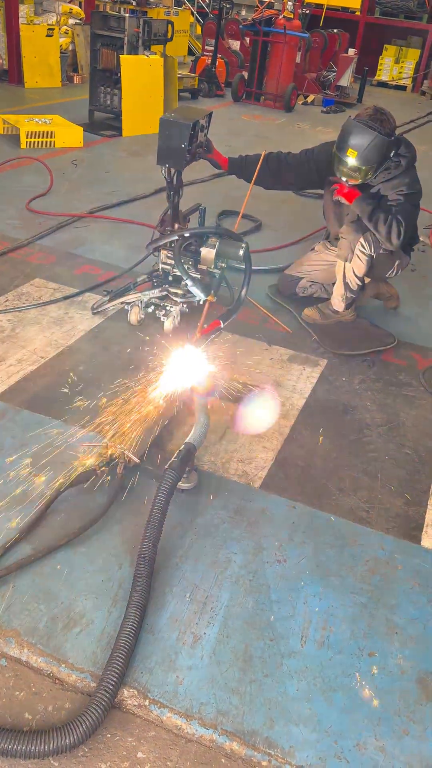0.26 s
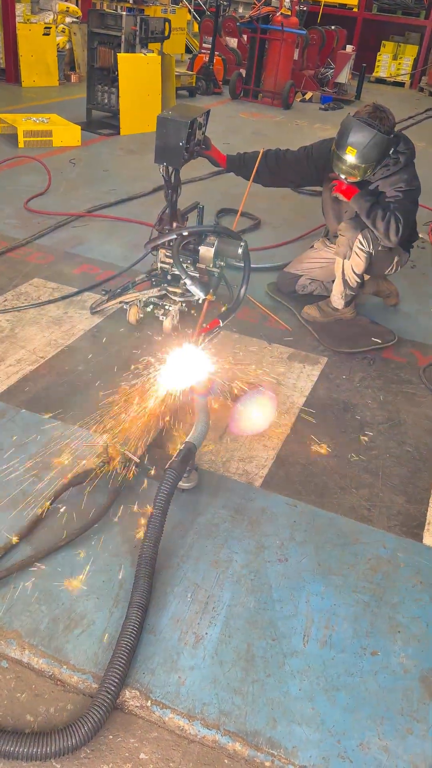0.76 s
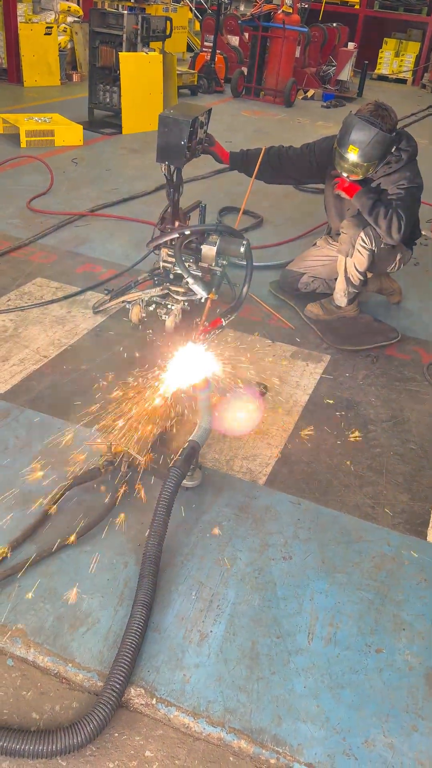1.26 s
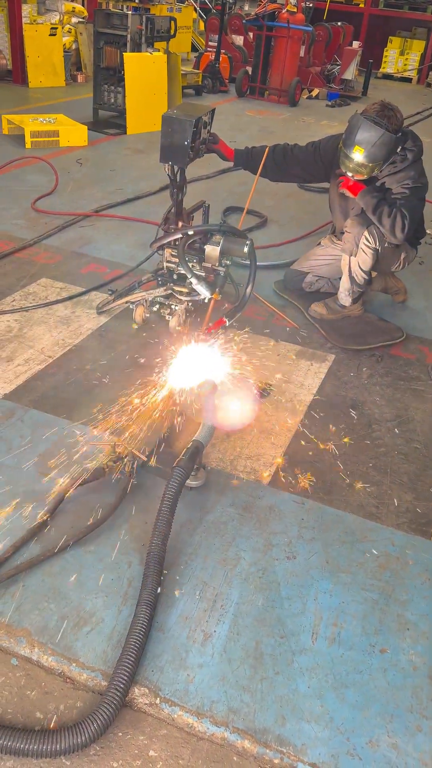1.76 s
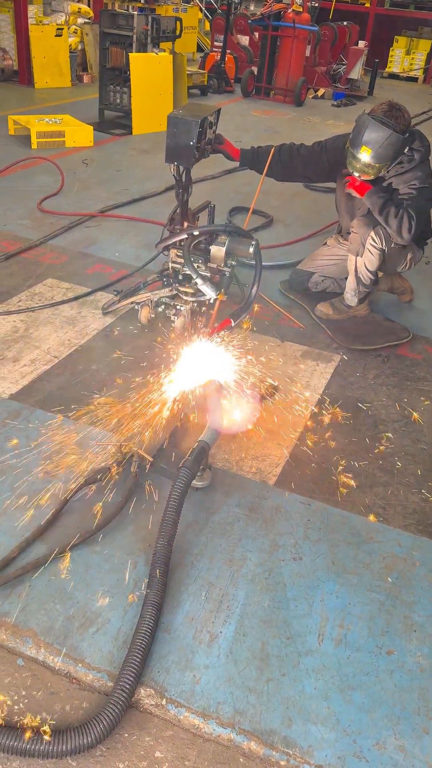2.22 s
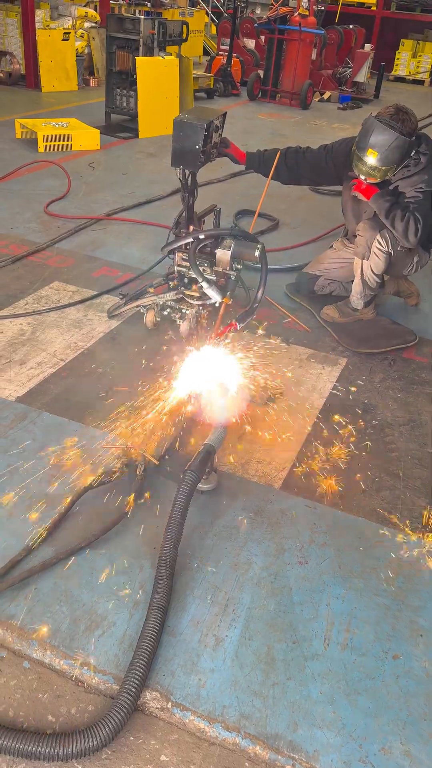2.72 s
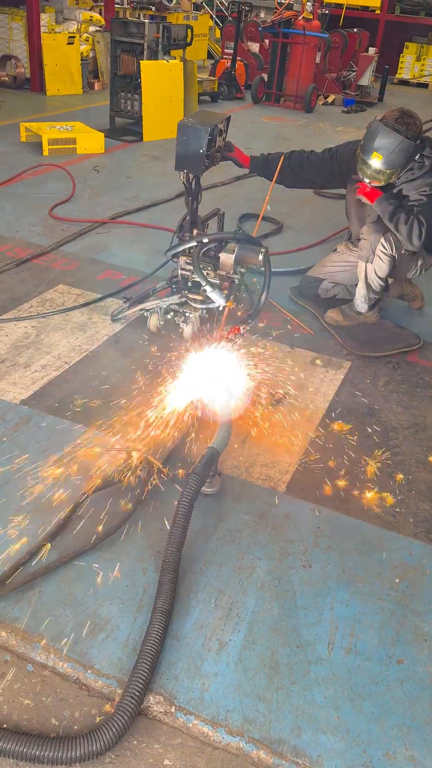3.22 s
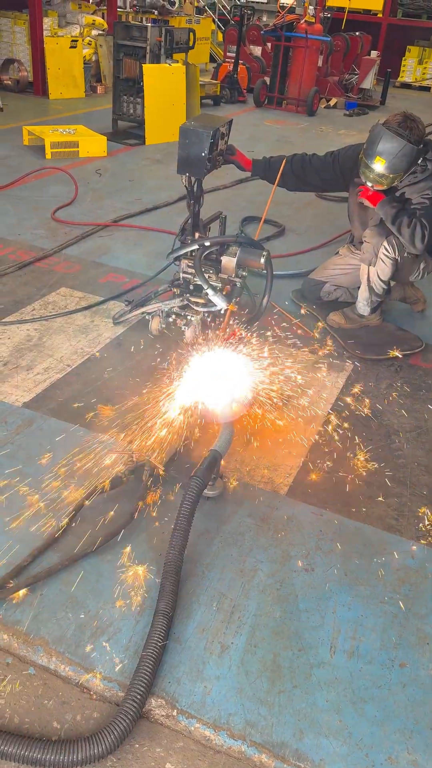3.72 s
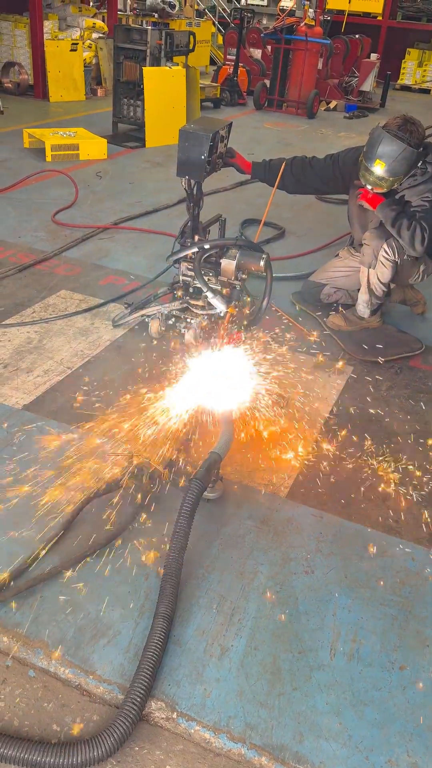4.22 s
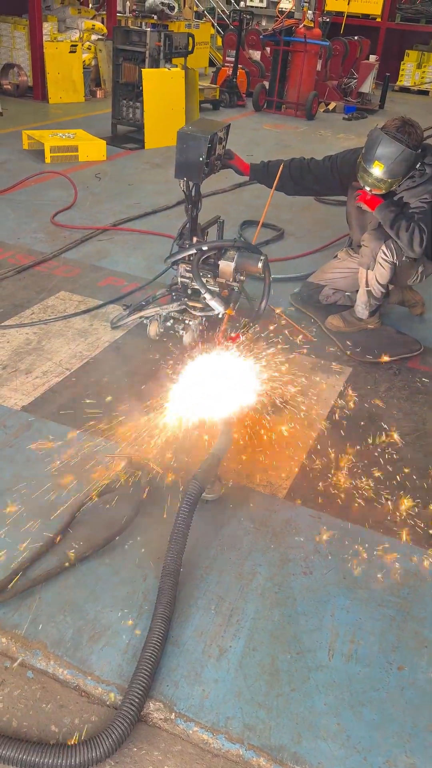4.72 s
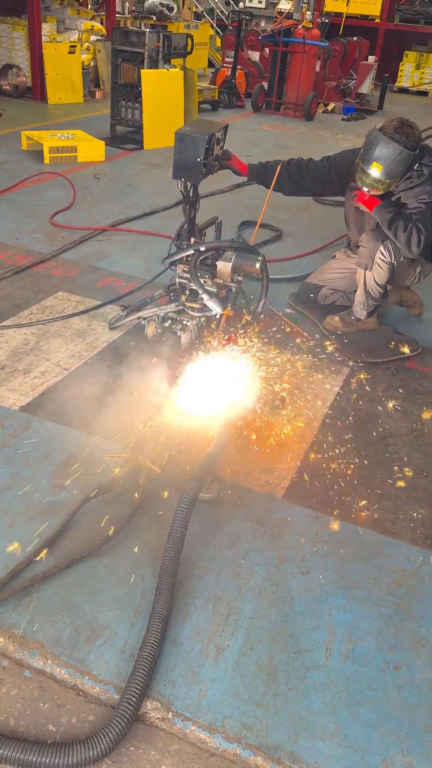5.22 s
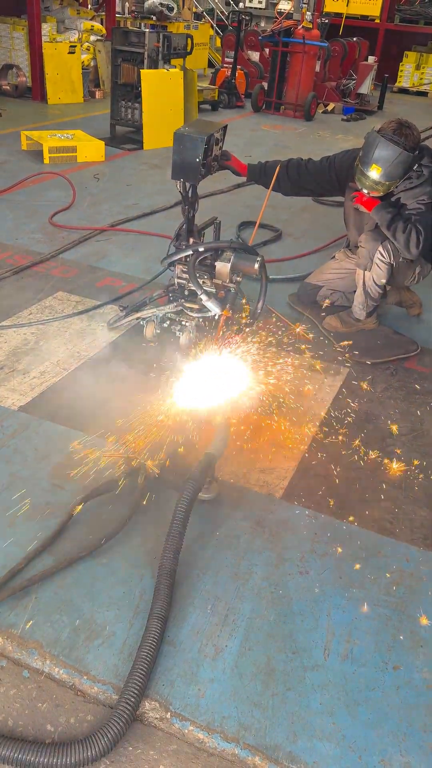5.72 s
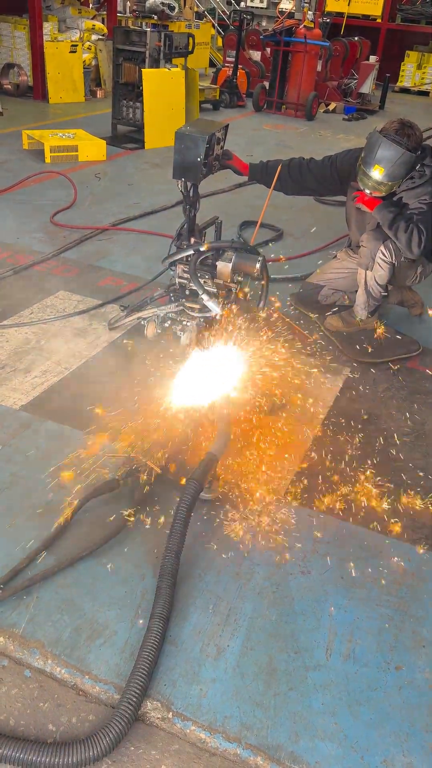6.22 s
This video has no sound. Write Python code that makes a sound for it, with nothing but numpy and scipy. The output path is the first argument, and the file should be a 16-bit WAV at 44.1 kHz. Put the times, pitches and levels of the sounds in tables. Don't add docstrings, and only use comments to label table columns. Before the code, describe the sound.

Close, harsh arc gouging on steel: bright tearing hiss and rapid crackle, sharp irregular snaps through the middle, then a slacker, duller roar.

```python
import sys
import numpy as np
from scipy import signal
from scipy.fft import rfft, irfft, next_fast_len
from scipy.io import wavfile

SR = 44100
rng = np.random.default_rng(int(sys.argv[2]) if len(sys.argv) > 2 else 0)


def invert_db(x):
    u = np.asarray(x, float) / 20
    return 10 ** u


def transcribe(signal):
    frames = np.atleast_2d(signal).T
    limited = np.clip(frames, -1, 1)
    pcm = np.round(limited * 32767).astype(np.int16)
    wavfile.write(sys.argv[1], SR, pcm)


N = 285327

# [t/s, blast level/dB, crackle level/dB]
CUT_COURSE = [(0, -18, -10.5), (.6, -19, -7.5), (1.2, -18.5, -5.5), (1.4, -19.5, -5.5), (1.95, -19.5, -5.5),
              (2.25, -21.5, -6.5), (2.8, -21, -6.5), (3.3, -21, -5.5), (3.8, -21, -4), (4.3, -22, -11.5),
              (4.65, -23, -10.5), (5.05, -22.5, -14.5), (5.2, -24, -4.5), (5.55, -25.8, -11),
              (5.8, -24, -9), (6, -26, -6), (6.47, -26, -13)]
# [t/s, level at the turning point/dB]
ROD_STUTTERS = [(.28, -1.5), (.75, 1.3), (1.1, -1), (1.28, -2), (1.52, 1), (1.64, 0.5), (2.04, -2.5),
                (2.13, 1), (2.17, -2), (2.36, -1.5), (2.47, 2), (2.54, -1.5), (2.84, -2), (3.15, -2),
                (3.41, 0.5), (3.46, -2), (3.51, 1.5), (3.92, -1.5), (4.19, -2.5), (4.41, -2.3),
                (4.73, -1.8), (5.14, -0.5), (5.24, -0.5), (5.45, -2), (5.5, 2), (5.55, -3), (5.76, -1.6),
                (6.33, 1.5)]
# [t/s, peak level/dB]
RESTRIKES = [(0.7778, 0), (0.9032, -3.8), (1.2139, -4.3), (1.5214, 0), (1.5371, 2), (1.5575, -1),
             (1.7405, -4.0), (1.7938, -3.9), (1.9008, -3.0), (2.1245, 1), (2.2245, -1), (2.4748, -3),
             (2.6335, -2), (2.7085, -2), (2.7868, -2), (2.7922, -1), (3.0156, -1), (3.3555, -4.3),
             (3.3866, -3), (3.4127, -4.0), (3.4674, -1), (3.5064, -4.2), (3.5201, 2), (3.555, 2),
             (3.6592, -2), (3.7136, -3), (3.829, -4), (3.8967, -3), (4.0599, -5), (5.085, -4)]
# [f/Hz, depth/0-1]
CURRENT_RIPPLE = [(99.88, 0.01), (199.8, 0.01), (299.66, .07)]
# [f/Hz, level per Hz/dB]
JET_ROAR = [(25, -52), (60, -39), (270, -25), (330, -19), (850, -12.5), (1020, -16), (1250, -10),
            (1750, -5.5), (2050, -1), (2850, -0.5), (3900, -2.5), (4850, -3), (5850, -0.5), (6500, -2.5),
            (7400, -5.5)]
# [f/Hz, added level/dB]
JET_HISS = [(7400, 0), (8900, 3), (9600, 1.5), (10400, 2), (12000, 0), (13400, -4), (14800, 0.5),
            (16000, -1)]
# [f/Hz, width/Hz, level/dB]
GROOVE_MODES = [(429, 38, 4), (590, 47, 4.5), (920, 170, 2.5), (1204, 89, 3.5), (1530, 55, 3.5),
                (1720, 74, -2), (2127, 86, -2.5), (2850, 150, 1.5), (3126, 140, -3), (3310, 150, 2.5),
                (4940, 120, -4), (5700, 160, 1)]
# [f/Hz, left minus right level/dB, right lead/rad,
# likeness/0-1]
PORT_PAIR = [(330, 0, -0.019, 0.99), (690, -2.6, 0.037, .97), (1030, -4, -0.2, 0.87),
             (1600, -1.5, 0.22, .988), (2020, -4.5, 0, 1), (2450, -1, -1.04, 0.9), (3050, 4, 0.55, .76),
             (4040, 2, 0.63, 1), (5100, 1, 1.92, 0.94), (5200, 7, 0.31, 0.74), (5450, 0, 0.22, 0.83),
             (5750, 0, 0, 0.94), (6600, 0, 0.35, 0.98), (7320, -0.5, 0.65, 0.88),
             (11220, 0, 2.47, 0.94), (11500, 0, 2.93, 0.98), (13900, 0, 3.5, 1),
                    (14500, 0, 3.9, .88), (16000, 0, 4.7, .88)]
CROSSOVERS = (1300, 1950, 4900, 7000, 12000)
# [f/Hz, rms level/dB]
HUM_LINES = [(97.18, -62), (99.88, -64.5), (199.81, -73), (299.69, -58), (334.4, -66)]
# [f/Hz, level per Hz/dB]
SHOP_RUMBLE = [(25, -44), (50, -9), (90, -4.5), (160, 1), (260, -3.5), (400, -6), (1200, -26)]

TREBLE_END_HZ = 15760
MEAN_BLAST_DB, MEAN_BITE_DB = -21, -7.5


def rms_one(x):
    return x / np.sqrt(np.mean(x ** 2) + 1e-20)


def in_time(rows):
    s, *columns = np.transpose(rows)
    return [np.interp(np.arange(N) / SR, s, c) for c in columns]


def at_hz(rows, hz):
    f, *columns = np.transpose(rows)
    return [np.interp(np.log(hz + 1), np.log(f), c) for c in columns]


def smooth(x, seconds):
    r = np.exp(-1 / (seconds * SR))
    return signal.lfilter([1 - r], [1, -r], x, zi=[r * x[0]])[0]


def drift(rate_hz):
    lag = 1 / (2 * np.pi * rate_hz)
    wander = smooth(smooth(rng.standard_normal(N + SR), lag), lag)
    slower = smooth(wander, 3 * lag)
    return rms_one((wander - slower)[SR:])


def rod_stutters():
    t = np.arange(N) / SR
    set_in_s, ease_off_s = 0.049, 0.061
    return sum(db * np.interp(t, [s - set_in_s, s, s + ease_off_s], [0, 1, 0]) for s, db in ROD_STUTTERS)


def arc(crackle_db, per_s, spread_db):
    t = np.arange(N) / SR
    current = 1
    for k, (hz, depth) in enumerate(CURRENT_RIPPLE):
        current = current + depth * np.cos(2 * np.pi * hz * t + k)
    sizes = invert_db(spread_db * np.minimum(rng.exponential(1, N), 3.5))
    chance = per_s * invert_db(3.0 * drift(25)) * current ** 3 / SR
    jumps = rng.random(N) < chance
    return current, -invert_db(crackle_db) * rms_one(sizes * jumps)


def jet(current, gust_db):
    flicker_db = gust_db * drift(11) + 1.2 * drift(70)
    return current * invert_db(flicker_db) * rng.standard_normal(N)


def restrikes(source):
    s, peak_db = np.transpose(RESTRIKES)
    source[np.round(s * SR).astype(int)] -= invert_db(peak_db - 2.2)
    return source


def floor_echo(source):
    delay_s, cut_hz, start, fade_s = .00238, 7000, 0.26, 2.9
    bounce = smooth(np.roll(source, round(delay_s * SR)), 1 / (2 * np.pi * cut_hz))
    return start * np.exp(-np.arange(N) / SR / fade_s) * bounce


def reflections(t60_s, size, channels):
    t = np.arange(SR) / SR
    tail = rng.standard_normal((channels, SR)) * invert_db(-60 * t / t60_s) * (t > .003)
    energy = np.sum(tail ** 2, axis=1, keepdims=True)
    return rfft(tail / np.sqrt(energy), size)


def along_the_cut(source, size):
    stops, clutter_db, clutter_t60_s, hall_t60_s = 9, -11.5, .12, .6
    near, hall = 0, 0
    for k in range(stops):
        share = np.clip(1 - abs(np.arange(N) * (stops - 1) / N - k), 0, 1)
        stretch = rfft(source * np.sqrt(share), size)
        near = near + stretch * reflections(clutter_t60_s, size, channels=1)
        hall = hall + stretch * reflections(hall_t60_s, size, channels=2)
    return rfft(source, size) + invert_db(clutter_db) * near, hall


def ports(source):
    size = next_fast_len(N + SR)
    hz = np.arange(size // 2 + 1) * SR / size
    groove_db = sum(db / (1 + (2 * (hz - centre) / width) ** 2) for centre, width, db in GROOVE_MODES)
    colour_db = at_hz(JET_ROAR, hz)[0] + at_hz(JET_HISS, hz)[0] + groove_db
    colour = invert_db(colour_db) * (hz < TREBLE_END_HZ)
    main_band = (hz > 1500) * (hz < 11000)
    colour = colour / np.sqrt(np.mean(colour ** 2 * main_band))
    tilt_db, lead, alike = at_hz(PORT_PAIR, hz)
    alike = np.clip(alike, 0, 1)
    shock_rad = -.4
    turn = np.exp(1j * (shock_rad + np.outer([0, 1], lead)))
    direct, hall = along_the_cut(source, size)
    heard = np.sqrt(alike) * turn * direct + np.sqrt(1 - alike) * hall
    return hz, heard * colour * invert_db(np.outer([.5, -.5], tilt_db))


def band_levels(blast_db, crackle_db):
    t = np.arange(N) / SR
    bite_db = crackle_db - MEAN_BITE_DB
    facing_s = 2.82
    rumble_db = -0.98 + 0.29 * (t - facing_s) ** 2 - 0.11 * bite_db
    choke_s, choke_width_s, choke_db = 5.55, .3, -4
    nozzle_db = -0.48 * bite_db + choke_db * np.exp(-((t - choke_s) / choke_width_s) ** 2)
    top_db = -.38 * (blast_db - MEAN_BLAST_DB) - .11 * bite_db
    air_db = top_db - 0.87 * t
    return [rumble_db, rumble_db, 0, nozzle_db, top_db, air_db]


def shading(hz, heard, band_db):
    above = [1] + [1 / (1 + (edge / (hz + 1)) ** 12) for edge in CROSSOVERS] + [0]
    mix = 0
    for lower, upper, db in zip(above, above[1:], band_db):
        part = irfft(heard * (lower - upper))[:, :N]
        mix = mix + invert_db(db + .5 * drift(14)) * part
    return mix


def hum(blast_db):
    beat_s = .11
    t = np.arange(N) / SR - beat_s
    load_from_s, load_to_s, load_edge_s, load_db = 0.77, 1.25, .05, 4.5
    inside_s = np.minimum(t + beat_s - load_from_s, load_to_s - beat_s - t)
    load = np.clip(inside_s / load_edge_s + .5, 0, 1)
    ripple_db = -.8 + load_db * load + .7 * (smooth(blast_db, .2) - MEAN_BLAST_DB)
    lines = 0
    for line_hz, db in HUM_LINES:
        level_db = db + drift(1.2) + (line_hz > 250) * ripple_db
        lines = lines + np.sqrt(2) * invert_db(level_db) * np.cos(2 * np.pi * line_hz * t)
    hz = np.arange(N // 2 + 1) * SR / N
    shape = invert_db(at_hz(SHOP_RUMBLE, hz)[0]) * (hz < TREBLE_END_HZ)
    rumble, side = irfft(rfft(rng.standard_normal((2, N))) * shape, N)
    rumble = rms_one(rumble) + invert_db(-29) * rms_one(side) * [[1], [-1]]
    return (lines + invert_db(-54.5) * rumble) * invert_db(1.5 - .5 * t)


def scene():
    blast_db, crackle_db = in_time(CUT_COURSE)
    blast_db = blast_db + rod_stutters()
    current, crackle = arc(crackle_db, per_s=900, spread_db=3.5)
    source = invert_db(blast_db + 0.31) * rms_one(jet(current, gust_db=-0.1) + crackle)
    source = restrikes(source)
    hz, heard = ports(source + floor_echo(source))
    return shading(hz, heard, band_levels(blast_db, crackle_db)) + hum(blast_db)


def band_limit(x):
    return signal.sosfilt(signal.butter(12, 16050, fs=SR, output="sos"), x)


def record(dry):
    return band_limit(dry)


dry = scene()
out = record(dry)
transcribe(out)
```